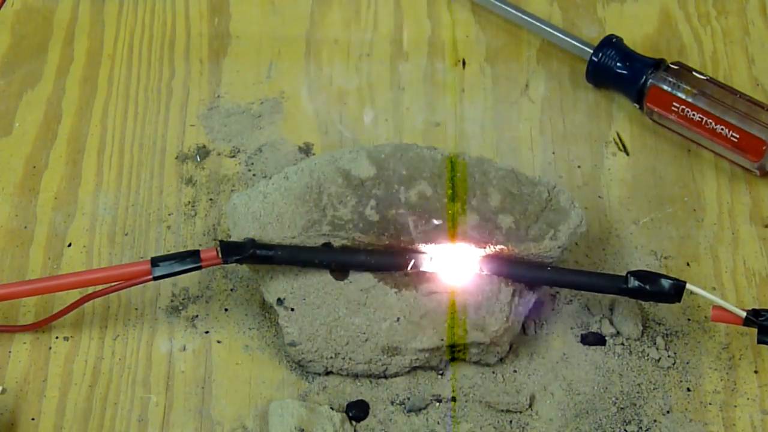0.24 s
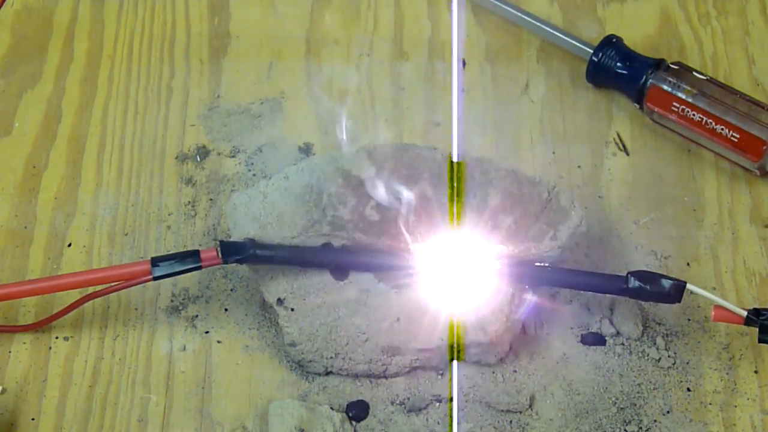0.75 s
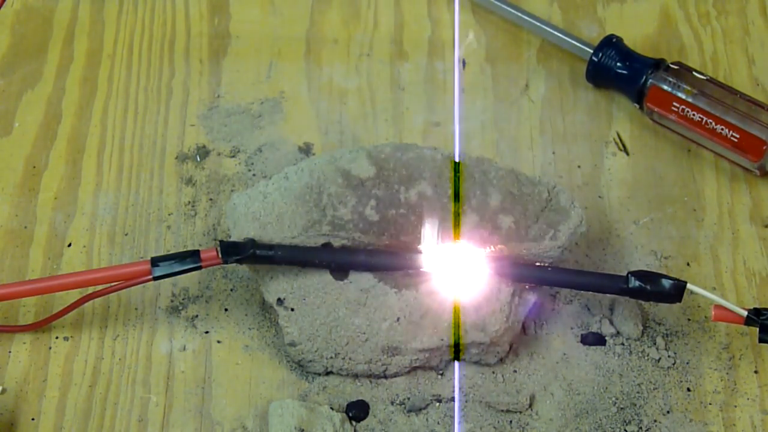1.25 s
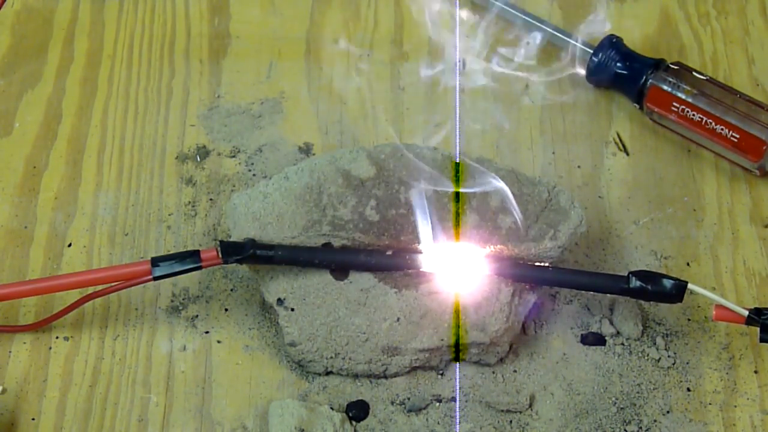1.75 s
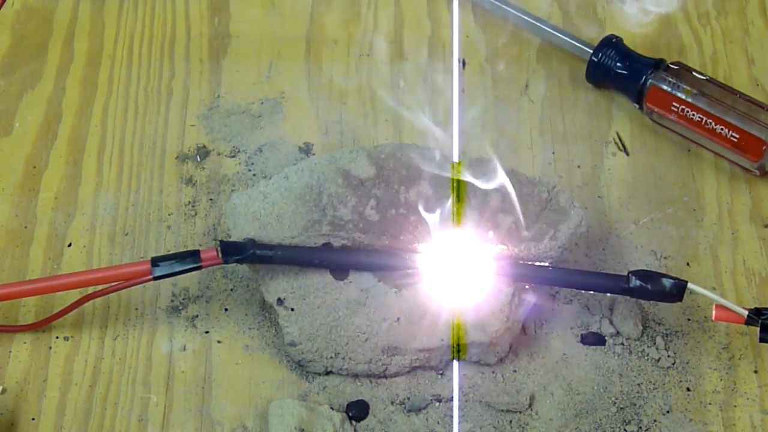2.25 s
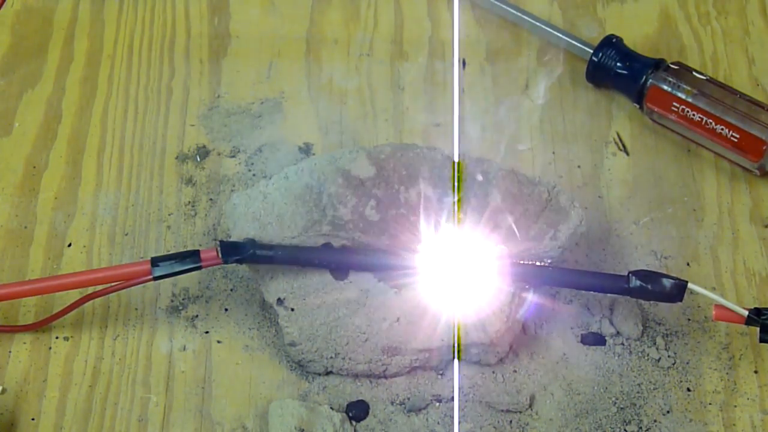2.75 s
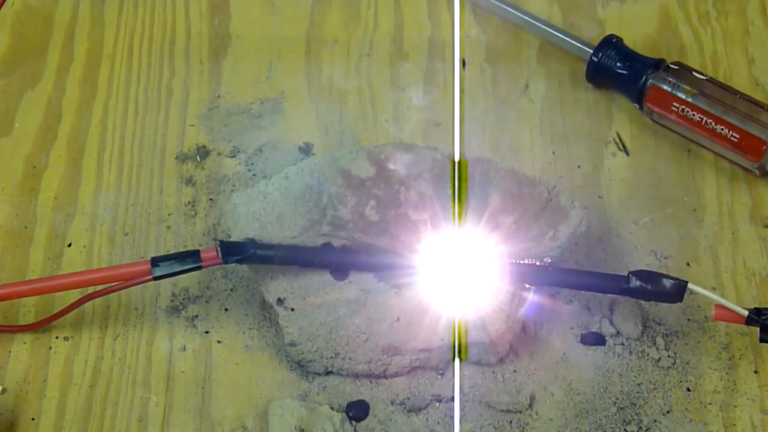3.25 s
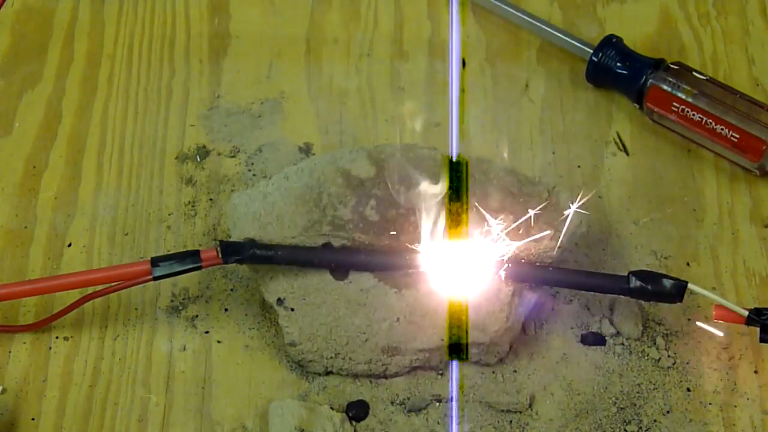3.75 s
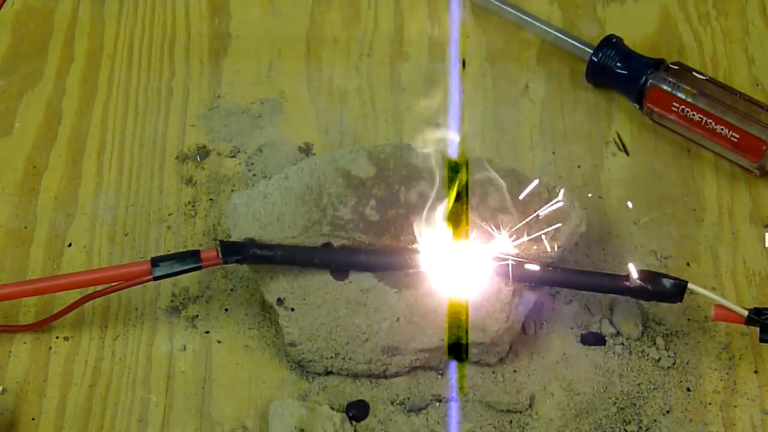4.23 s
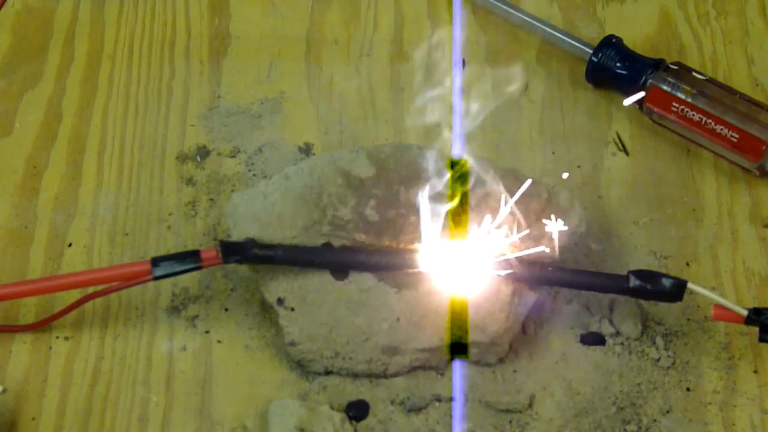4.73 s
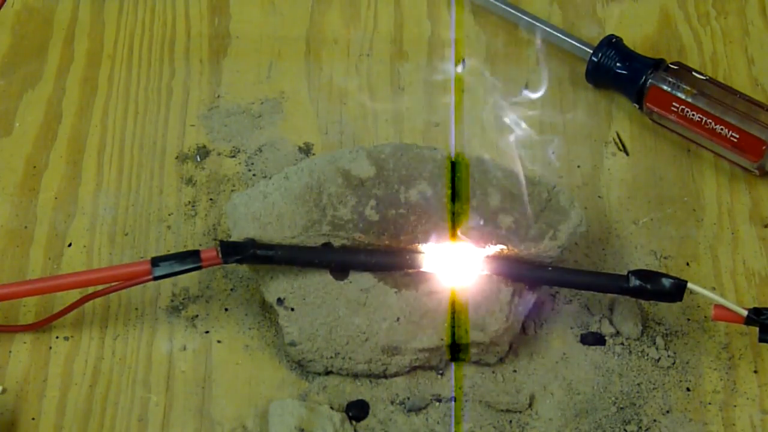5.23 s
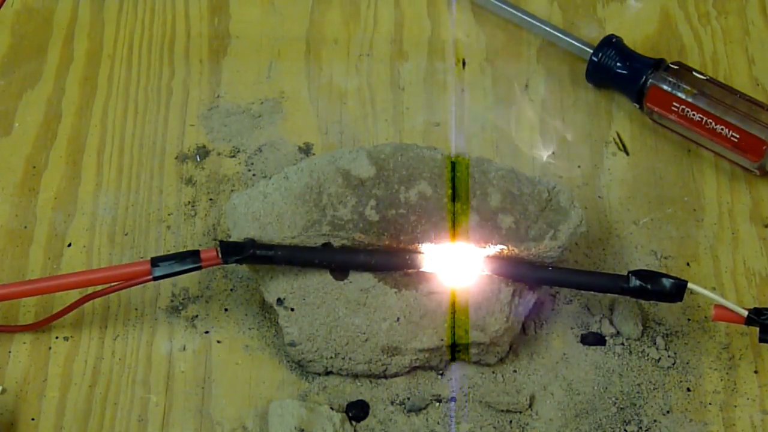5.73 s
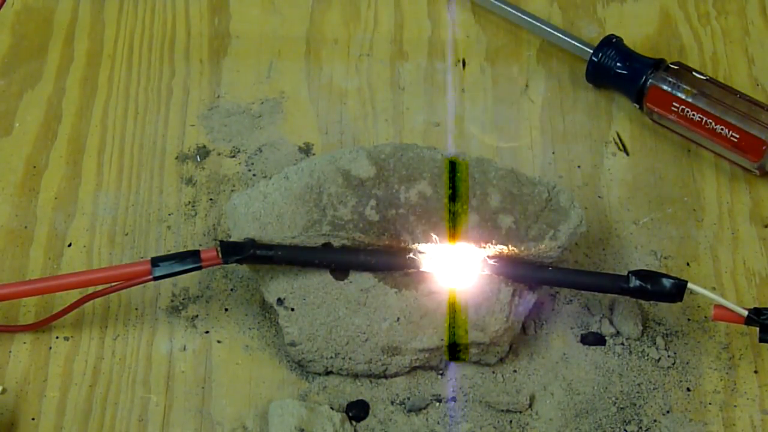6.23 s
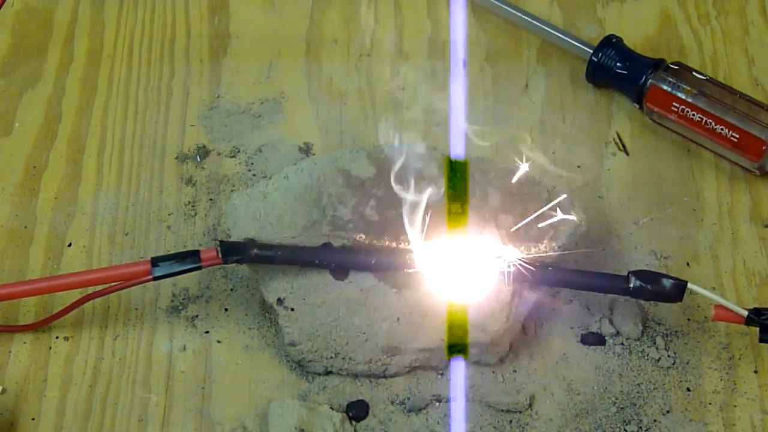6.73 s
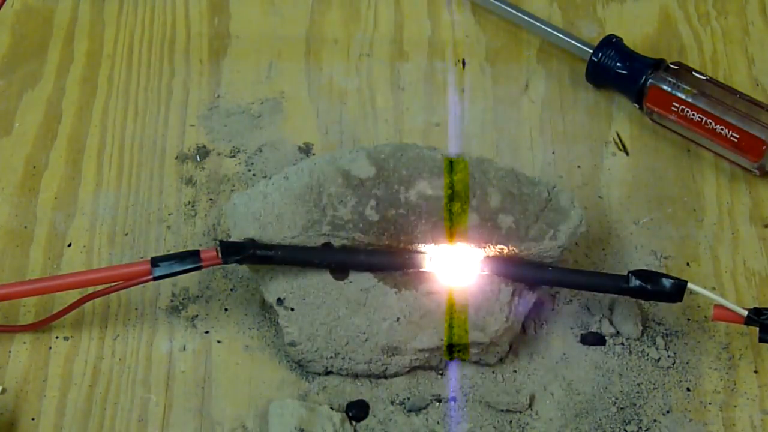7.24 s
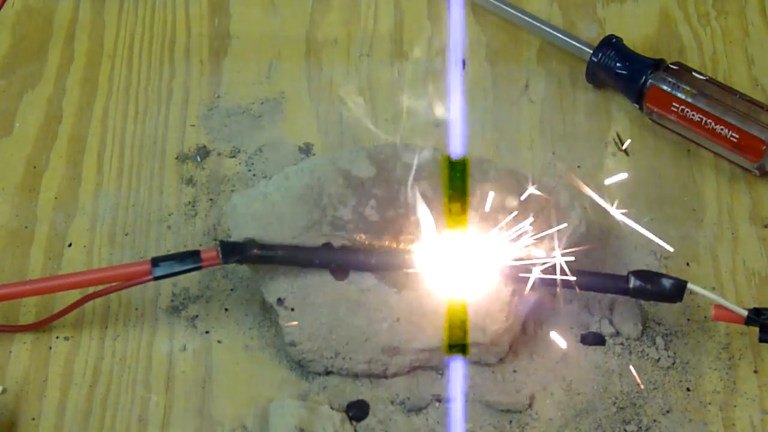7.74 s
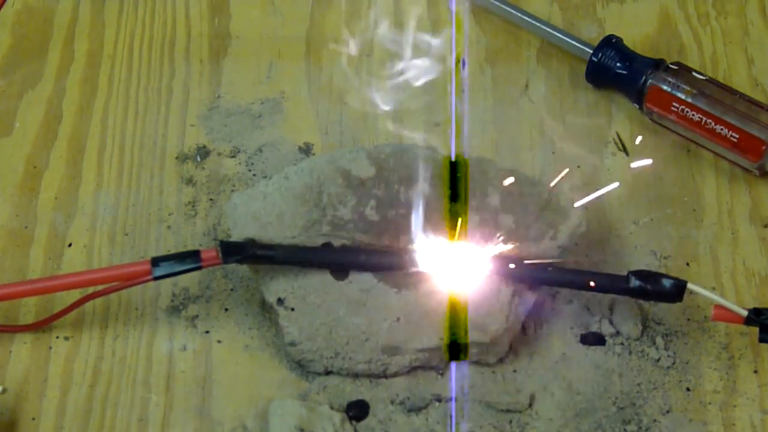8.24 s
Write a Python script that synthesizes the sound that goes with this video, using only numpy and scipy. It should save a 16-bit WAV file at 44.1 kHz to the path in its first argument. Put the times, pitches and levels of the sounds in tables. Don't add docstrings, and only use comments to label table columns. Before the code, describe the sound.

A small electric arc hisses sharply and very brightly on a workshop bench, flaring, sputtering, dropping out and crackling over a faint power-supply hum.

```python
import sys
import numpy as np
from scipy import signal
from scipy.fft import rfft, irfft, next_fast_len
from scipy.io import wavfile
from scipy.ndimage import uniform_filter1d, map_coordinates

SR = 44100
rng = np.random.default_rng(int(sys.argv[2]) if len(sys.argv) > 2 else 0)


def file_out(sig):
    cols = np.atleast_2d(sig).T
    lim = np.clip(cols, -1, 1)
    pcm = np.round(lim * 32767).astype(np.int16)
    wavfile.write(sys.argv[1], SR, pcm)


def voltage_ratio(level):
    return 10 ** (np.asarray(level, float) / 20)


N = 373968

# (frequency [Hz], level [dB per Hz])
BRIGHT_COLOUR = [(4650, -37), (7900, -8.5), (8110, -7.5), (8990, 0), (10900, 1), (14100, 1.5),
                 (15200, -3.5), (15700, -20)]
# (frequency [Hz], level [dB per Hz])
BODY_COLOUR = [(1620, -67), (2750, -28.5), (3030, -12.5), (3520, -10.5), (4300, -5), (4610, -5.5),
               (5430, -3), (6590, -0.5), (7900, -7.5), (10300, -5), (17400, -120)]
# (time [s], room noise [dB])
GAIN_CONTROL = [(0.0, -62), (0.04, -53), (0.07, -57.5), (0.38, -62.5), (1.01, -62), (2.15, -62),
                (2.53, -62.5), (3.12, -57), (4.23, -68), (6.0, -53.5), (6.19, -67), (7.11, -60.5),
                (7.39, -66.5), (7.41, -63.5), (8.39, -64.5), (8.48, -60)]
# (time [s], lift [dB], tilt [dB])
BURNING_GAS = [(0, 0, -1.7), (.5, 0.5, -0.5), (1.05, -3.5, 4.5), (1.9, 1, 0.3), (2.4, -2, 2.5),
               (3.3, 0.5, -0.5), (3.6, 0, 0), (4.0, 0.5, -2.4), (4.5, -0.5, -1.7), (4.7, -3.5, 1),
               (5.0, 1, .1), (5.5, -0.5, -0.5), (5.9, 2.5, -1), (6.25, -0.5, -1), (6.6, 1.5, -2),
               (7.2, 1.5, -0.5), (7.7, 3, -1), (8.48, -2, -1.5)]


def unit(x):
    return x / np.sqrt(np.mean(x ** 2) + 1e-20)


def along(points, hz):
    f, value = np.transpose(points)
    return np.interp(np.log(hz + 1), np.log(f + 1), value)


def curves(rows):
    s, *columns = np.transpose(rows)
    return [np.interp(np.arange(N) / SR, s, column) for column in columns]


def wobble(rate):
    coarse = np.arange(0, N + 16, 16)
    points = rng.standard_normal(int(N * 400 / SR))
    return np.interp(np.arange(N), coarse, map_coordinates(points, [coarse * rate / SR]))


def filtered(x, response):
    m = next_fast_len(N + SR // 2)
    return irfft(rfft(x, m) * response(np.fft.rfftfreq(m, 1 / SR)), m)[..., :N]


def coloured(x, spectrum):
    return unit(filtered(x, lambda hz: voltage_ratio(along(spectrum, hz))))


def arc_level():
    # (time [s], level [dB])
    slow_level = [(0.0, -24.5), (0.3, -19.5), (0.75, -25.5), (1.2, -29.5), (1.45, -32), (2.195, -37),
                  (2.21, -26), (3.0, -27), (3.51, -30), (3.525, -20.5), (4.58, -19.5), (4.68, -27),
                  (5.1, -25), (6.02, -28), (6.04, -18.5), (6.9, -20.5), (7.45, -22.5), (8.48, -21.5)]
    # (peak time [s], height [dB], length [s])
    swell_list = [(0.098, 5, 0.04), (0.231, 4, 0.18), (0.597, 6, 0.043), (0.636, 2.5, 0.11),
                  (0.894, 3.4, 0.024), (0.998, 8, 0.064), (1.225, 4.0, 0.028), (1.288, 12.5, 0.13),
                  (1.364, 7, 0.034), (1.831, 10.5, 0.023), (2.197, 0, 0.02), (2.39, 6, 0.15),
                  (2.45, 5.5, 0.027), (2.538, 6.5, 0.065), (3.029, 5, 0.084), (3.433, 10, 0.03),
                  (3.526, 5, 0.031), (5.045, 3, 0.19), (5.474, 7.5, 0.051), (7.1, 2, 0.043),
                  (7.193, 5.5, 0.15), (7.296, 2, 0.07), (7.57, 2.5, 0.064), (7.839, 5, 0.07),
                  (7.936, 3, 0.07), (8.005, 4.5, 0.025)]
    # (restrike time [s], depth [dB], length [s])
    dropout_list = [(.21, 7, 0.037), (0.579, 4, .02), (0.853, 0.5, 0.016), (1.173, 2, .057),
                    (1.822, 2, 0.095), (2.207, -0.5, .02), (2.664, 2.5, 0.041), (3.116, 1.5, 0.071),
                    (3.162, 2.5, 0.022), (3.3, 0, .02), (3.41, 2, 0.069), (3.516, 1, 0.058),
                    (4.68, 1.5, 0.072), (4.74, 1.5, .043), (4.913, 2.5, 0.062), (5.27, 1.5, 0.039),
                    (5.369, 5, 0.056), (5.657, 20, 0.026), (5.678, 7, 0.041), (5.82, 6, 0.031),
                    (5.903, 1.5, 0.039), (6.99, 4.5, 0.065), (7.012, 3.5, 0.08), (7.152, 5.5, 0.035),
                    (7.526, 2, 0.069), (7.7, 2, 0.091), (8.138, 3, 0.019), (8.223, 3, 0.0097),
                    (8.328, 3.5, .02), (8.49, 7, 0.029)]
    fading_share, restrike_s, deepen = 0.13, .005, 1.73
    t = np.arange(N) / SR
    level_db = curves(slow_level)[0]
    for s, db, length in swell_list:
        level_db += db * np.interp(t, [s - length / 2, s, s + length / 2], [0, 1, 0])
    for s, db, length in dropout_list:
        corners = [s - length, s - (1 - fading_share) * length, s, s + restrike_s]
        level_db -= deepen * db * np.interp(t, corners, [0, 1, 1, 0])
    return level_db


def arc(arc_db):
    # (time [s], sputtering [0-1])
    sputter_curve = [(0, 0.17), (1.5, 0.43), (1.75, 0.72), (3.45, 1), (3.55, 0.05), (4.55, 0), (4.7, 0.6),
                     (6.0, 1), (6.06, 0), (7.3, 0.19), (8.48, 0.5)]
    sputter = np.clip(curves(sputter_curve)[0], 0, 1)
    uneven = .7 * wobble(28) + .6 * wobble(55) + 1.6 * wobble(130)
    flicker_db = (.3 + sputter) * uneven + .7 * wobble(240)
    steady = voltage_ratio(arc_db - 0.3 + .6 * wobble(17))
    strength = np.sqrt((steady * voltage_ratio(flicker_db)) ** 2 + flares())
    sparks, hiss = discharges(sputter), rng.standard_normal(N)

    bright_mix = (.55 + .3 * sputter) * sparks + (.75 - .3 * sputter) * hiss
    bright = strength * tilted(coloured(bright_mix, BRIGHT_COLOUR))

    body_db = follow(arc_db, level_db=-38.5, arc_share=0.58, gain_share=0.16, smoothing=900)
    surge = np.clip(strength / steady, 0, 4) ** 0.81
    body = voltage_ratio(body_db + 0.61 * wobble(40)) * surge * coloured(0.26 * sparks + 1.5 * hiss, BODY_COLOUR)
    return bright + body + ticks(arc_db, sputter), flicker_db


def discharges(sputter):
    per_second = 6000 * voltage_ratio(-11 * sputter)
    struck = rng.random(N) < per_second / SR
    size_db = (3.5 + 2.5 * sputter) * rng.exponential(size=N).clip(0, 1.9)
    sparks = struck * voltage_ratio(size_db) * np.sign(rng.standard_normal(N))
    return sparks / np.sqrt(np.abs(uniform_filter1d(sparks ** 2, size=8000)) + 1e-9)


def flares():
    # (time [s], peak [dB], length [ms])
    flare_list = [(0.082, -2.5, 7.2), (0.21, -1, 8), (.578, -3, 6), (1.257, -4, 8.7), (1.826, -18, 14),
                  (2.207, -2, 6.9), (2.265, -5, 7), (2.3585, -6, 6), (2.6, -11, 6), (2.92, -7.5, 10),
                  (3.169, -13, 5.1), (3.237, -10.5, 9.2), (3.307, -4, 6.6), (3.422, -4, 8.7),
                  (3.52, -2, 4.7), (3.6441, -2, 6), (5.117, -3, 6), (5.268, -5, 6.3), (5.368, -4.5, 4.5),
                  (5.652, -3, 1), (5.699, -6, 9), (5.8154, 3, 3.8), (5.913, -2, 3.3), (6.042, -0.5, 12),
                  (7.014, -2.5, 8.8), (7.148, -3, 6), (7.89, 0.5, 9.9), (7.969, 0.5, 7.7), (8.049, -1, 5),
                  (8.316, -1, 6.6)]
    power, t = np.zeros(N + SR), np.arange(SR // 8) / SR
    for s, db, ms in flare_list:
        shape = (1 - np.exp(-t / 0.00027)) * np.exp(-(1000 * t / ms) ** 5.6)
        power[round((s - .001) * SR):][:len(t)] += voltage_ratio(2 * (db - 16.5)) * shape
    return power[:N]


def ticks(arc_db, sputter):
    # (time [s], peak [dB])
    tick_list = [(0.0793, -10), (1.8375, -16), (2.213, -7), (2.2639, -11), (2.2964, -14), (2.5602, -11),
                 (2.7717, -10), (2.88, -12), (3.1274, -13), (3.1842, -12), (3.235, -11), (3.3101, -10),
                 (3.4204, -11), (3.5213, -8), (4.8252, -12), (5.1171, -9), (5.1842, -13), (5.2024, -13),
                 (5.272, -12), (5.3691, -11), (5.4746, -9), (5.539, -12), (5.6533, -10), (5.6693, -13),
                 (5.8166, -9), (5.9144, -5), (6.0004, -12), (6.022, -12), (8.2649, -10), (8.3909, -11)]
    stray_per_s, stray_db = 30, 11
    pulses = (rng.random(N) < stray_per_s * sputter / SR) * voltage_ratio(arc_db + stray_db)
    s, db = np.transpose(tick_list)
    pulses[np.round(s * SR).astype(int)] = voltage_ratio(db)
    pulses = voltage_ratio(8) * pulses * np.sign(rng.standard_normal(N))
    return filtered(pulses, lambda hz: voltage_ratio(along(BRIGHT_COLOUR, hz)) + 0.5 * voltage_ratio(along(BODY_COLOUR, hz)))


def tilted(x):
    tilt_db = curves(BURNING_GAS)[1]
    low = filtered(x, lambda hz: 1 / (1 + (hz / 10600) ** 6))
    return voltage_ratio(-tilt_db) * low + voltage_ratio(tilt_db) * (x - low)


def follow(arc_db, level_db, arc_share, gain_share, smoothing):
    usual_arc_db, usual_room_db = -25, -62
    arc_swing = uniform_filter1d(arc_db, size=smoothing) - usual_arc_db
    gain_swing = curves(GAIN_CONTROL)[0] - usual_room_db
    return level_db + curves(BURNING_GAS)[0] + arc_share * arc_swing + gain_share * gain_swing


def flame(arc_db, flicker_db):
    # (frequency [Hz], level [dB per Hz])
    roar_colour = [(320, -23.5), (550, -17), (616, -6), (678, -13), (765, 3), (846, -8), (936, -3.5),
                   (1140, -12), (1350, 0), (1520, -9), (1720, -5.5), (2270, -10), (2500, -7.5), (3250, -16),
                   (5500, -120)]
    level_db = follow(arc_db, level_db=-54.5, arc_share=0.33, gain_share=0.74, smoothing=2500)
    level_db = level_db + .6 * flicker_db + 1.3 * wobble(26)
    roar = rng.standard_normal(N)
    return voltage_ratio(level_db) * coloured(roar + .35 * walls(roar)[0], roar_colour)


def pops():
    # (time [s], peak [dB])
    pop_list = [(0.619, -37), (0.844, -34), (1.292, -36), (3.329, -35), (5.719, -39)]
    out, t = np.zeros(N + SR), np.arange(SR // 10) / SR
    for s, db in pop_list:
        fading = voltage_ratio(db + 8 - 60 * t / .025)
        out[round(s * SR):][:len(t)] += fading * rng.standard_normal(len(t))
    return filtered(out[:N], lambda hz: (hz / 300) / (1 + hz / 300) / (1 + 1j * hz / 2300) ** 2)


def tone(hz, loose):
    t = np.arange(N) / SR
    return np.sqrt(2) * np.sin(2 * np.pi * (hz * t + rng.random()) + loose * wobble(5.7))


def workshop():
    # (frequency [Hz], level [dB per Hz])
    room_colour = [(15, -45), (40, -28), (50, -4), (75, -3.5), (240, -10), (310, -3), (400, -1),
                   (485, -7.5), (560, -12.5), (730, -45), (1230, -120)]
    # (frequency [Hz], level over the room noise [dB])
    hum_lines = [(177.5, -9), (211, -13), (240, -9), (360, -4.5), (480, -10), (600, -19), (960, -10)]
    # (time [s], transformer [dB], bench rumble [dB], hum lift [dB])
    supply_load = [(0.0, -77, -79, -5), (0.35, -80, -81, -5.5), (1.28, -69, -69, -0.5),
                   (1.75, -67.5, -78, 4), (3.4, -70, -61, -0.5), (4.08, -68.5, -71, 0),
                   (4.25, -80, -71, -1), (5.24, -63, -62, -1), (5.34, -78, -76, -2.5), (5.45, -75, -67, -3),
                   (5.69, -68, -83, -5), (5.74, -65, -74, -6), (6.5, -75, -86, -2), (7.06, -64, -64, -3.5),
                   (7.2, -70, -75, -5), (7.68, -77, -65, -1), (8.12, -62.5, -77, -1.5),
                   (8.48, -71, -62, 0.5)]
    room_db = curves(GAIN_CONTROL)[0]
    mains_db, rumble_db, lift_db = curves(supply_load)
    hum = sum(voltage_ratio(db + lift_db + 1.4 * wobble(1.26)) * tone(hz, 0.28) for hz, db in hum_lines)
    rumble = voltage_ratio(rumble_db + 3 * wobble(6)) * tone(54, .5)
    transformer = voltage_ratio(mains_db + 3 * wobble(5)) * tone(120, 0.25)
    room = 0.78 * coloured(rng.standard_normal(N), room_colour)
    return voltage_ratio(room_db) * (room + hum) + rumble + transformer


def echoes(x, table):
    hz = np.fft.rfftfreq(8192, 1 / SR)
    bounces = sum(1.13 * g * np.exp(-2j * np.pi * hz * ms / 1000) for ms, g in table)
    answer = irfft(np.exp(bounces))
    return signal.fftconvolve(x, np.roll(answer, 64))[64:N + 64]


def walls(x):
    t = np.arange(SR // 4) / SR
    tail = rng.standard_normal((2, len(t))) * voltage_ratio(-60 * t / .15)
    late = np.pad(x, (330, 0))[None]
    return signal.fftconvolve(late, tail / np.linalg.norm(tail[0]), axes=1)[:, :N]


def scene():
    # (delay [ms], strength [ratio])
    echo_both = [(0.994, -0.065), (2.083, -0.06), (2.255, 0.075), (2.374, 0.13), (2.457, -0.07),
                 (3.81, 0.105), (5.148, 0.125), (6.526, -0.11), (6.98, 0.05), (7.165, -0.045)]
    # (delay [ms], strength [ratio])
    echo_left = [(0.926, -0.05), (1.082, 0.06), (1.344, 0.06), (1.504, 0.08), (2.688, -0.05),
                 (2.726, -0.07), (2.954, -0.07), (3.522, 0.08), (4.198, 0.05), (4.566, 0.06), (4.912, 0.09),
                 (5.304, -0.07), (5.414, 0.14), (5.57, 0.1), (5.768, -0.06), (5.856, 0.08), (6.416, -0.09),
                 (10.518, 0.05)]
    # (delay [ms], strength [ratio])
    echo_right = [(0.416, -0.05), (0.776, 0.07), (1.256, -0.05), (1.426, 0.08), (1.53, 0.09), (1.796, 0.09),
                  (2.786, 0.08), (2.908, 0.06), (3.356, 0.08), (3.722, -0.07), (5.016, -0.08),
                  (5.366, -0.05), (5.606, 0.06), (5.686, 0.08), (6.028, -0.06), (6.34, 0.08),
                  (6.724, -0.06), (6.9, -0.06)]
    arc_db = arc_level()
    hiss, flicker_db = arc(arc_db)
    near = np.array([echoes(hiss, echo_both + own) for own in (echo_left, echo_right)])
    wet = near + voltage_ratio(-9) * walls(hiss)
    around = flame(arc_db, flicker_db) + workshop() + pops()
    apart = voltage_ratio(-16.5) * np.roll(around, 3000) * [[1], [-1]]
    return wet * voltage_ratio([[-1.2], [-.55]]) + around + apart


def top_cut(x):
    return signal.sosfilt(signal.butter(12, 16500, fs=SR, output="sos"), x)


def record(dry):
    # (centre [Hz], width [Hz], gain [dB])
    housing = [(2615, 110, -36), (4610, 120, -32), (735, 28, 4.5), (795, 30, -2), (4370, 30, -10),
               (7930, 110, -8)]
    # (frequency [Hz], gain [dB])
    spread = [(2400, 0.0), (3400, 7.5), (4700, -3), (5100, 4.0), (9000, 2.0), (14000, 7.0)]

    def housing_response(hz):
        gain_db = sum(db * np.exp(-((hz - centre) / width) ** 2) for centre, width, db in housing)
        return voltage_ratio(gain_db) * (hz < 15750)

    limited = dry / (1 + np.abs(dry / .75) ** 4) ** .25
    left, right = filtered(limited, housing_response)
    mid = (left + right) / 2
    side = filtered((left - right) / 2, lambda hz: voltage_ratio(along(spread, hz)))
    return top_cut(np.array([mid + side, mid - side]))


dry = scene()
out = record(dry)
file_out(out)
```